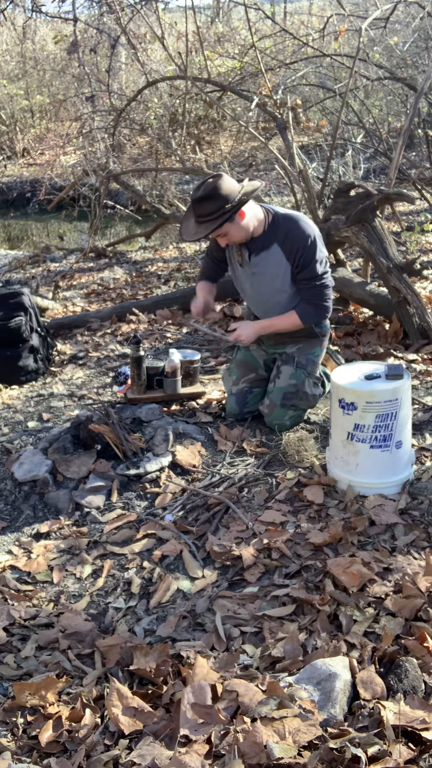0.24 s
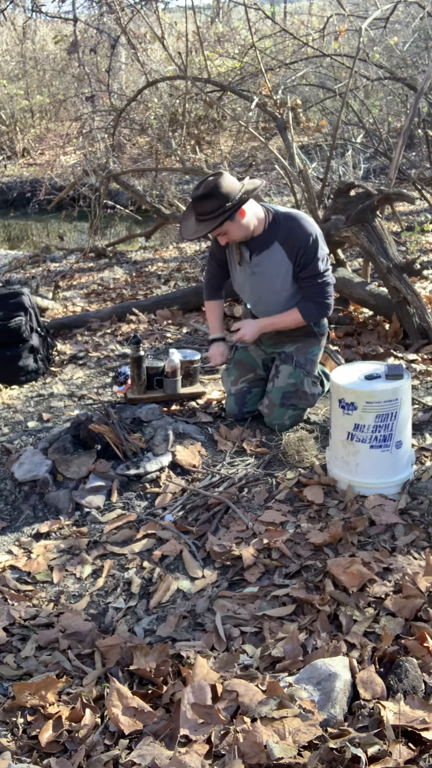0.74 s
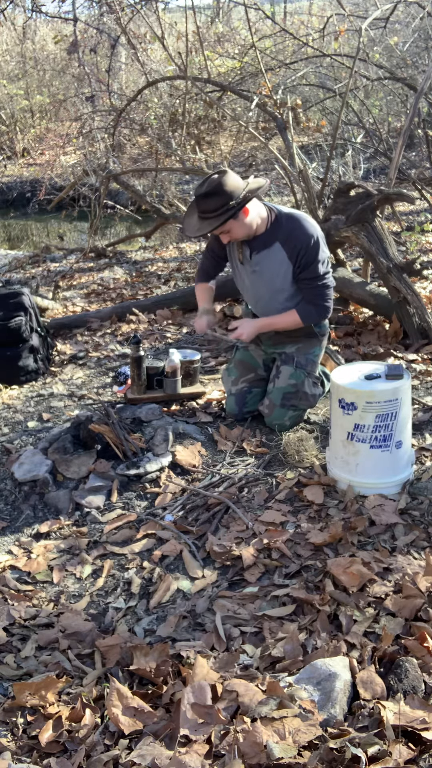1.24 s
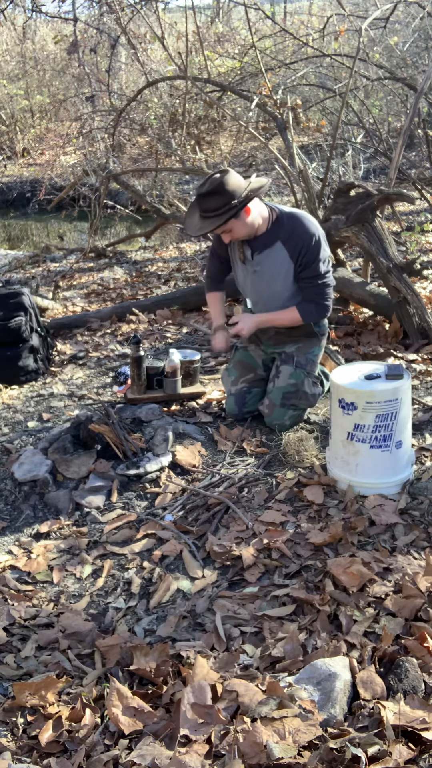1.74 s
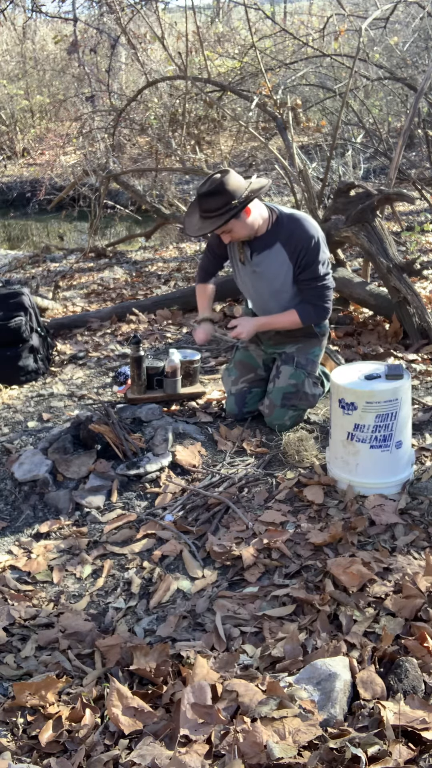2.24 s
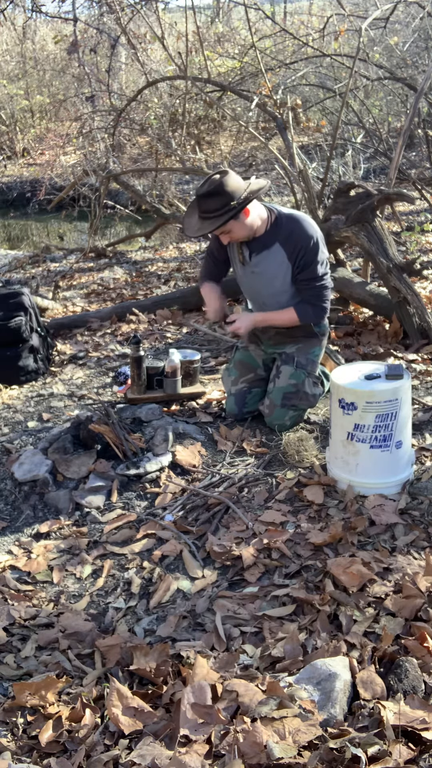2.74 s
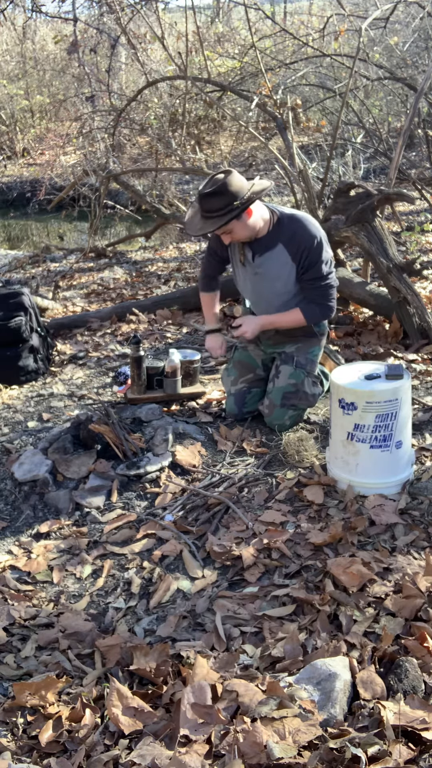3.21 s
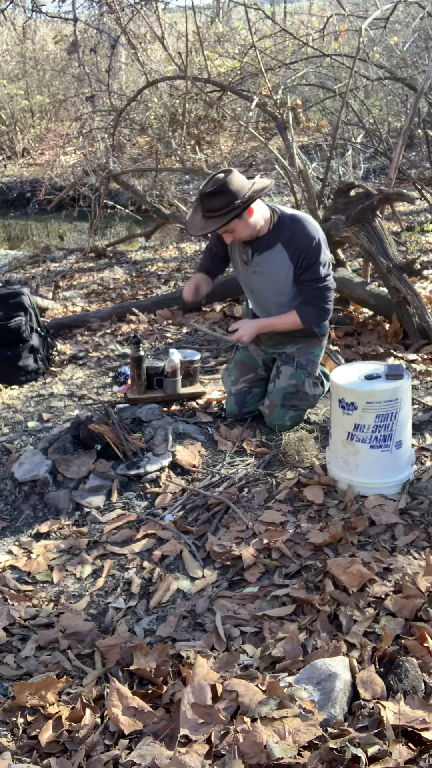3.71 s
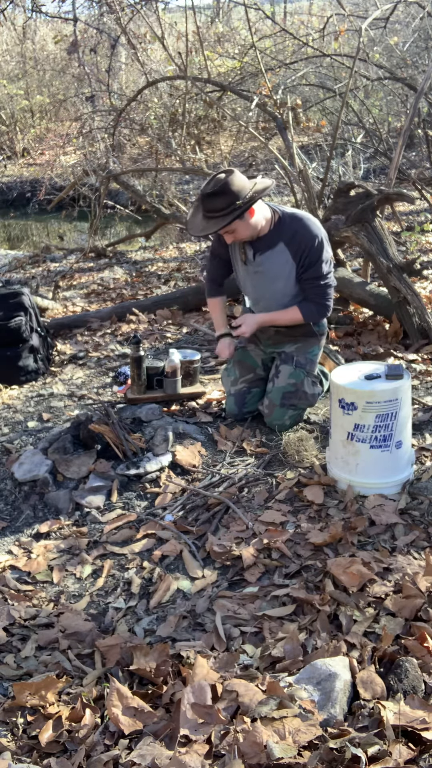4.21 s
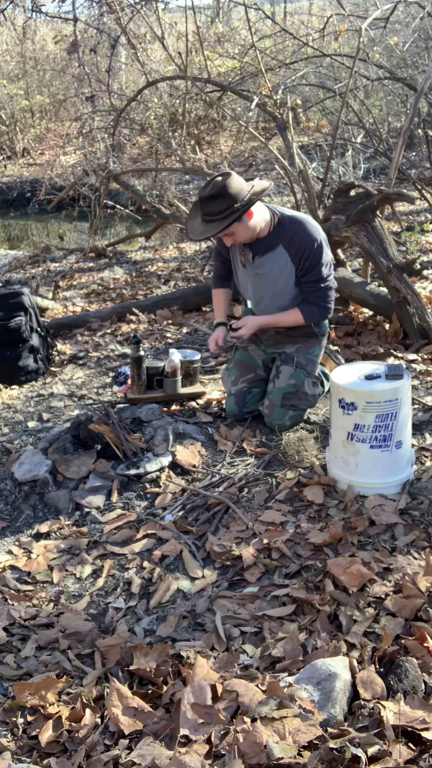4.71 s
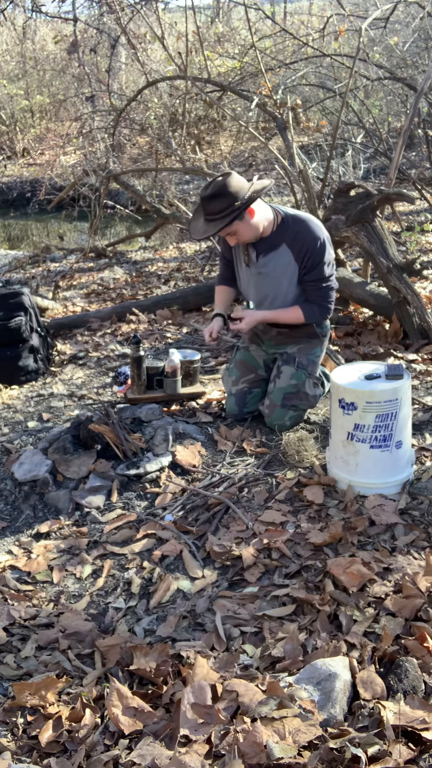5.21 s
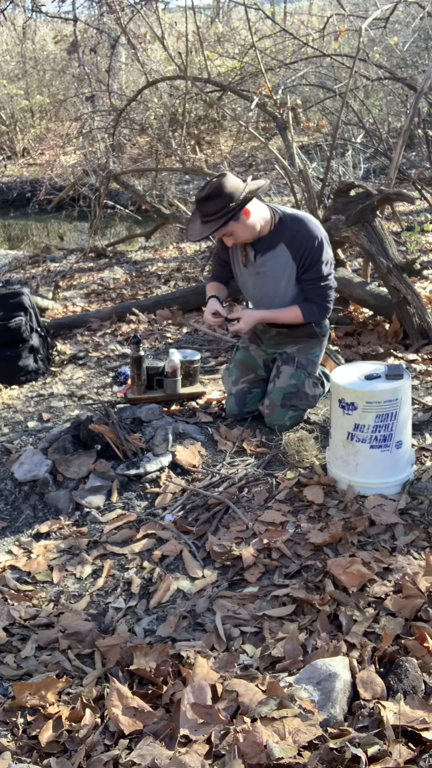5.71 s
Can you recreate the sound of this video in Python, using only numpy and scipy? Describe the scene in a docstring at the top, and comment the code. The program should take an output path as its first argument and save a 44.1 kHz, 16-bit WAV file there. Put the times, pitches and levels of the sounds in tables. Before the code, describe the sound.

In quiet, leafless woods, the echo of a blow struck just before the start is fading over low, softly swelling wind rumble and a faint, wavering engine drone far away. From 0.2 seconds a steel striker glances off a hand-held flint a few metres ahead, evenly, roughly every 0.35 seconds, thirteen times. Each blow is a very short, dry stony crack with a small woody-low knock, a bright gritty scrape and a brief damped steel ring, varying in brightness and ring. Bare trunks scatter it into a diffuse, uneven tail lasting about half a second. A light extra touch comes right before the blow at 3.3 seconds. Tiny chips tick almost inaudibly into dry leaves. Blows weaken from about 3.3 seconds, the softest and last at 4.4. Then the echo dies into wind, with faint bird peeps around 4.9 seconds and a barely audible one near 5.9.

```python
"""Leafless woods, two microphones: the echo of an earlier blow is dying over a low wind rumble and a far engine's drone.
From 0.2 to 4.4 s a steel striker glances off a hand-held flint about three times a second, a few metres ahead.
Each blow bites, scrapes for a few milliseconds and rings the steel; trunks scatter it, tiny chips tick into dry leaves.
After the last blow, faint bird notes, short sine glides, are left above the wind, which is shaped noise."""
import sys
import numpy as np
from scipy import signal
from scipy.fft import rfft, irfft
from scipy.io import wavfile
from scipy.ndimage import uniform_filter1d

SR = 44100
rng = np.random.default_rng(int(sys.argv[2]) if len(sys.argv) > 2 else 0)


def inscribe(sig):
    """Save sig as 16-bit PCM at rate SR to the path in sys.argv[1].

    A 1-D sig is mono; a 2-D sig holds one channel per row.
    Samples are clipped to [-1, 1] before scaling.
    """
    pcm = np.round(np.clip(np.atleast_2d(sig).T, -1, 1) * 32767)
    wavfile.write(sys.argv[1], SR, pcm.astype(np.int16))


N = 262395
BLOW_SIZE = 4096  # samples in one blow

# full blows of steel on flint; the crack level is an rms over 10 ms, the last three are relative to the crack:
# [t/s, crack level/dB, crack centre f/Hz, ring centre f/Hz, knock level/dB, grit level/dB, ring level/dB]
STRIKES = [(0.211, -26.5, 4350, 7900, -6.5, 7, -1), (0.5546, -28, 2313, 7510, -6, 0.5, 0),
           (0.8981, -26.5, 3920, 7200, -5.5, -2.5, 1.5), (1.2465, -27.5, 2950, 7600, -9.5, 3, 6.5),
           (1.5906, -27, 2720, 7900, -3, 10, -1), (1.9363, -27, 3060, 7800, -8, 9.5, 7.5),
           (2.278, -26, 3004, 7700, -8, 6, 7.5), (2.6288, -26, 3800, 6580, -7, 3.5, -2),
           (2.975, -25, 2440, 6800, -8.5, -1, -7.5), (3.3161, -31.5, 3410, 7200, -15.5, 9.5, 7.5),
           (3.6763, -30.5, 3950, 5550, -7, 9.5, -2), (4.037, -35, 2900, 7560, -8, 1.5, 2),
           (4.394, -39, 2213, 7580, -2.5, 2, -3.5)]


def undb(db):
    """Decibels to gain."""
    return 10 ** (np.asarray(db) / 20)


def along(table, hz, axis=1):
    """Read one column of a table on a log-frequency axis."""
    table = np.array(table, float)
    return np.interp(np.log(np.maximum(hz, 1)), np.log(table[:, 0]), table[:, axis])


def burst(x, db):
    """Scale a short sound to the energy of 10 ms at this rms level."""
    return x * undb(db) * np.sqrt(SR / 100 / np.sum(x ** 2))


def add(track, s, sound):
    """Mix a sound into a track at time s."""
    i = int(s * SR)
    track[i:i + len(sound)] += sound[:N - i]


def resonate(x, modes):
    """Ring [f/Hz, width/Hz, level/dB] modes side by side, each with its level as gain at its centre."""
    out = 0
    for hz, width, db in modes:
        b, a = signal.iirpeak(hz, hz / width, fs=SR)
        out = out + undb(db) * signal.lfilter(b, a, x)
    return out


def colour(x, db):
    """Minimum-phase filter with the given gain at each frequency bin, so nothing sounds before its cause."""
    cepstrum = irfft(np.log(undb(db)))
    # fold the cepstrum onto positive time
    cepstrum[1:len(x) // 2] *= 2
    cepstrum[len(x) // 2 + 1:] = 0
    return irfft(rfft(x) * np.exp(rfft(cepstrum)))


def diffuse(size):
    """Spectra of two noises, as alike at the two microphones as sound arriving from all around."""
    # likeness of the two channels, held within -1 to 1 below: [f/Hz, correlation]
    likeness_curve = [(60, 1), (130, 0.99), (290, 0.86), (640, -0.2), (1400, 0.21), (3100, -0.51),
                      (7800, -0.25), (8700, -0.78), (10200, -1.4), (11500, -0.197), (14000, -0.72)]
    hz = np.arange(size // 2 + 1) * SR / size
    likeness = np.clip(along(likeness_curve, hz), -1, 1)
    mid, side = rfft(rng.standard_normal((2, size)))
    mid = mid * np.sqrt((1 + likeness) / 2)
    side = side * np.sqrt((1 - likeness) / 2)
    return np.array([mid + side, mid - side])


def walk(rate):
    """Slow random wander with a spread of 1, redrawn at this rate in Hz and smoothed twice."""
    k = int(SR / rate)
    steps = np.repeat(rng.standard_normal(N // k + 1), k)
    wander = uniform_filter1d(uniform_filter1d(steps, k), k)[:N]
    return wander / wander.std()


def wind(level_db=-44.5, gust_db=1.5, flutter_db=0.13, ripple_db=2.5, ripple_hz=25):
    """A rumble that swells gently under a distant hush, rippled by its many paths through the trees."""
    # relative spectrum of wind and distant air: [f/Hz, level per Hz/dB]
    air_curve = [(20, -27), (30, -20), (43, -1.5), (70, 3), (110, -6), (165, -10), (230, -20), (500, -19.5),
                 (1000, -26.5), (1800, -33.5), (3000, -43.5), (5000, -56.5), (9500, -65.5), (12500, -60.5),
                 (15000, -60.5), (16000, -72)]
    # lean of the air to the left: [f/Hz, left minus right level/dB]
    lean_curve = [(60, 1), (300, 5.5), (1200, 0)]
    hz = np.arange(N // 2 + 1) * SR / N
    ripple = np.interp(hz / ripple_hz, np.arange(2048), rng.standard_normal(2048))
    ripple = ripple_db * ripple * hz / (hz + 150)  # smoother in the bass
    lean = along(lean_curve, hz) * np.array([[.5], [-.5]])
    air = diffuse(N) * undb(along(air_curve, hz) + ripple + lean)
    bass = 1 / (1 + (hz / 150) ** 2)
    rumble = irfft(air * bass, N) * undb(gust_db * walk(7.7))
    hush = irfft(air * (1 - bass), N) * undb(flutter_db * walk(4))
    out = rumble + hush
    return out * undb(level_db) / out.std()


def far_engine(waver=0.014):
    """Only the firing note carries this far, a sine wavering in pitch on its way."""
    # pitch of the engine before it wavers: [t/s, f/Hz]
    pitch_curve = [(0, 74), (.45, 80), (1.45, 109.5), (1.9, 114), (2.45, 105), (3.25, 112), (3.7, 105),
                   (4.3, 115)]
    # rms level midway between the two channels: [t/s, level/dB]
    level_curve = [(0, -39.5), (.25, -51.5), (1.15, -59.5), (1.45, -46), (2.4, -52.5), (4, -50),
                   (5.95, -73.5)]
    t = np.arange(N) / SR
    hz = np.interp(t, *np.transpose(pitch_curve))
    db = np.interp(t, *np.transpose(level_curve))
    phase = 2 * np.pi * np.cumsum(hz * (1 + waver * walk(25))) / SR
    lean_db = np.array([[.9], [-.9]])  # a little louder on the left
    return np.sqrt(2) * np.sin(phase) * undb(db + lean_db)


def bird():
    """Faint, short notes: sines that glide or hold, each swelling and fading once."""
    # far birds, by peak level: [t/s, length/s, start f/Hz, end f/Hz, level/dB]
    notes = [(4.916, 0.025, 1880, 1880, -61.5), (4.955, 0.043, 4550, 4300, -71),
             (5.913, 0.018, 5330, 5380, -79)]
    track = np.zeros(N)
    for s, length_s, from_hz, to_hz, db in notes:
        hz = np.linspace(from_hz, to_hz, int(length_s * SR))
        note = np.sin(2 * np.pi * np.cumsum(hz) / SR)
        add(track, s, undb(db) * np.hanning(len(hz)) * note)
    return track


def woods(x, trunks, build_s=0.0043, thin_s=0.017, thinning=1.0):
    """Echoes from trunks and leaf litter build up, thin out with distance, and die at a rate set by pitch."""
    # sound scattered back by trunks and litter: [f/Hz, level/dB, t60/s]
    bands = [(500, -15, 0.3), (1269, -21, 0.59), (2964, -10, 1), (5866, -7, 0.55), (7660, -18, 0.53),
             (10300, -26.5, 0.37), (15200, -14, .3)]
    size = len(trunks)
    t, hz = np.arange(size) / SR, np.arange(size // 2 + 1) * SR / size
    build = 1 - np.exp(-(t / build_s) ** 2)
    spread = trunks * build / (1 + t / thin_s) ** thinning
    noise, echoes = diffuse(size), 0
    for row, (_, db, t60) in zip(np.eye(len(bands)), bands):
        share = np.interp(hz, np.array(bands)[:, 0], row)  # bands overlap as triangles
        fade = spread * np.exp(-np.log(1000) * t / t60)
        echoes = echoes + undb(db) * irfft(noise * share) * fade / np.linalg.norm(fade)
    return signal.fftconvolve(x[None], echoes, axes=1)[:, :N]


def earlier_blow(trunks, ago_s=0.1, db=-2):
    """The striking is already under way: the echo of a blow before the start is still dying."""
    track, gone = np.zeros(N), int(ago_s * SR)
    add(track, 0, undb(db) * blow(*STRIKES[1][1:]))  # struck like the second full blow
    return np.pad(woods(track, trunks)[:, gone:], ((0, 0), (0, gone)))


def from_ahead(x):
    """Direct sound and nearest echoes reach the two microphones out of step, the left later over most pitches."""
    # first returns from the nearest things standing about: [delay/s, level/dB]
    near_echoes = [(.0068, -17.5), (.0115, -22.5), (.0145, -21), (.026, -26.5)]
    # phase by which the left microphone lags: [f/Hz, lag/rad]
    lag_curve = [(100, -3.5), (800, 0.35), (1700, 1), (2700, 0.84), (3500, 0.43), (4400, 1.5), (6000, 1.58),
                 (7000, 1.68), (9700, 3.5), (12000, 4), (15000, 11)]
    near = x.copy()
    for delay_s, db in near_echoes:
        add(near, delay_s, undb(db) * x)
    lag = uniform_filter1d(along(lag_curve, np.arange(N // 2 + 1) * SR / N), size=2000)
    left = irfft(rfft(near) * np.exp(-1j * lag), N)
    return np.array([left, near])


def scrape(bite, peak_s, sharpness, skid_db, rough_db=1.5, skid_s=0.027):
    """The edge bites with one impulse, then tears through uneven micro-slips that swell, fade and skid out."""
    t = np.arange(BLOW_SIZE) / SR
    swell = (t / peak_s * np.exp(1 - t / peak_s)) ** sharpness
    pressure = swell + undb(skid_db) * np.exp(-t / skid_s)
    slips = pressure * rng.standard_normal(BLOW_SIZE) * undb(rough_db * rng.standard_normal(BLOW_SIZE))
    slips /= np.linalg.norm(slips)
    slips[0] += bite
    return slips


def stone_knock(give_s=.0008, centre_hz=1293):
    """The heavy stone in the fist gives way a moment after contact, in nearly one push."""
    # the held flint: [ratio to the knock's centre, width/Hz, level/dB]
    knock_modes = [(1.02, 200, 7.5), (0.85, 700, -4), (.47, 450, -13.5)]
    push = np.roll(scrape(bite=1.4, peak_s=0.00089, sharpness=2.4, skid_db=-32.0), int(give_s * SR))
    knock = resonate(push, [(ratio * centre_hz, width, db) for ratio, width, db in knock_modes])
    return signal.sosfilt(signal.butter(3, [300, 1550], "bandpass", fs=SR, output="sos"), knock)


def stone_crack(crack_hz):
    """A scrape rings the stone's sharper resonances; the spot that is hit decides which of them speak."""
    # the stone's sharper resonances: [f/Hz, width/Hz, level/dB]
    crack_modes = [(2410, 438.8, 0.5), (2970, 520, -2.5), (3903, 380, 0), (4395, 290, -4), (5975, 952, -2),
                   (8380, 1300, 4)]
    crack = resonate(scrape(bite=0.25, peak_s=.0018, sharpness=0.98, skid_db=-23.0), crack_modes)
    crack = resonate(crack, [(4200, 5000, 0), (crack_hz, 600, -4)])
    return signal.sosfilt(signal.butter(6, 2150, "highpass", fs=SR, output="sos"), crack)


def steel_grit(contact, grit_db, centre_hz=10910, hz_per_db=129.5):
    """Shavings fizz as the edge cuts the steel; a deeper cut sheds more grit, and brighter."""
    # steel being shaved by the edge, before the bright hump is added: [f/Hz, level/dB]
    grit_curve = [(300, -40), (3000, -22), (6000, -9), (8000, -2), (9500, -2), (10800, -1), (11600, -4),
                  (12300, 1), (14100, -9), (15100, 0), (16000, -20)]
    hz = np.arange(BLOW_SIZE // 2 + 1) * SR / BLOW_SIZE
    hump_db = 7 * np.exp(-((hz - centre_hz - hz_per_db * grit_db) / 1400) ** 2)
    return colour(contact, along(grit_curve, hz) + hump_db)


def steel_ring(contact, ring_hz, fall_db_per_khz=8.5):
    """The gripped striker rings briefly; modes far from the ring centre of this blow speak less."""
    # the striker, damped by the grip, before that fall: [f/Hz, width/Hz, level/dB]
    steel_modes = [(5897, 110, -1.5), (6070, 140, -2.5), (6830, 140, -6.5), (7260, 130, -6),
                   (7754, 150, 1.5)]
    ring = 0
    for hz, width, db in steel_modes:
        fall_db = fall_db_per_khz * abs(hz - ring_hz) / 1000
        mode = resonate(contact, [(hz, width, db - fall_db)])
        ring = ring + resonate(mode, [(hz, 1200, 0)])  # trims the skirts of the mode
    return ring


def blow(crack_db, crack_hz=3200, ring_hz=7500, knock_db=-8, grit_db=1, ring_db=0):
    """One glancing blow: stone knocks and cracks, while one contact both shaves the steel and rings it."""
    contact = scrape(bite=.8, peak_s=0.0013, sharpness=0.97, skid_db=-25.5)
    stone = burst(stone_crack(crack_hz), 0) + burst(stone_knock(), knock_db)
    steel = burst(steel_grit(contact, grit_db), grit_db) + burst(steel_ring(contact, ring_hz), ring_db)
    return undb(crack_db) * (stone + steel)


def leaf_chip(db):
    """A chip landing in dry leaves: a tiny scrape through one broad, bright resonance."""
    tick = scrape(bite=0.94, peak_s=0.00051, sharpness=0.97, skid_db=-23.5)
    return burst(resonate(tick, [(11000, 7000, 0)]), db)


def flint_and_steel():
    """All the blows, one light touch, the short faint returns of some blows, and the chips in the leaves."""
    # one light touch just before a blow (3.3125 s); the others are short, faint returns of a blow,
    # probably echoes, each made like a blow of average colour: [t/s, crack level/dB]
    touch_and_returns = [(0.5682, -40), (1.2572, -43.5), (2.9868, -38), (3.3125, -32.5), (4.42, -54.5)]
    # chips landing in the leaves, rms over 10 ms: [t/s, level/dB]
    chips = [(0.711, -71), (1.432, -73), (1.447, -78), (4.158, -82), (4.504, -73), (4.618, -85.5)]
    track = np.zeros(N)
    for s, *row in STRIKES + touch_and_returns:
        add(track, s, blow(*row))  # the touch and the returns keep the default colour
    for s, db in chips:
        add(track, s, leaf_chip(db))
    return track


def scene(count=3, size=32768):
    """The strikes and their echoes over the quiet of the woods."""
    # trees stand in clumps, so the echoes return in uneven bunches
    trunks = undb(3.5 * walk(500)[:size])
    background = wind() + far_engine() + earlier_blow(trunks)
    # the scrape radiates differently in each direction, so its echoes blur into a wash
    echoes = sum(woods(flint_and_steel(), trunks) for _ in range(count)) / np.sqrt(count)
    return background + echoes + from_ahead(flint_and_steel() + bird())


def record(dry):
    """The recorder cuts the top steeply above 15.9 kHz."""
    return signal.sosfilt(signal.ellip(8, .2, 80, 15900, fs=SR, output="sos"), dry)


dry = scene()
out = record(dry)
inscribe(out)
```